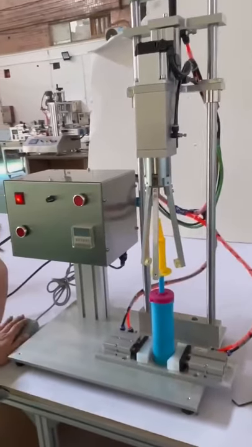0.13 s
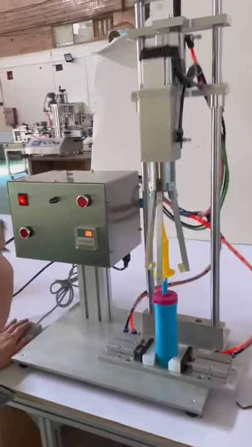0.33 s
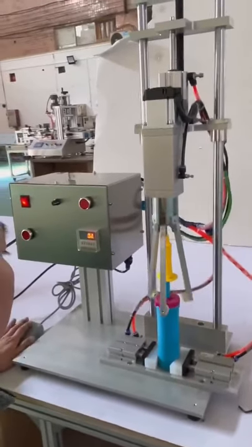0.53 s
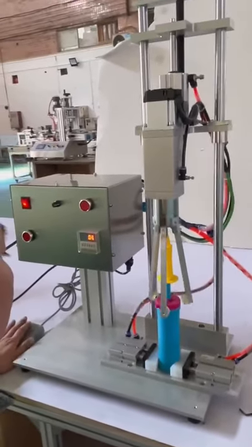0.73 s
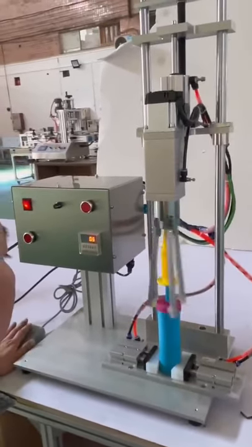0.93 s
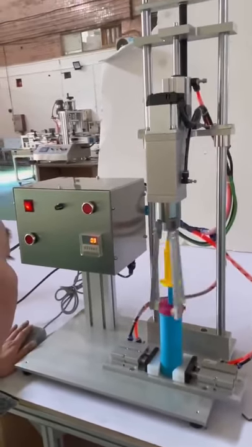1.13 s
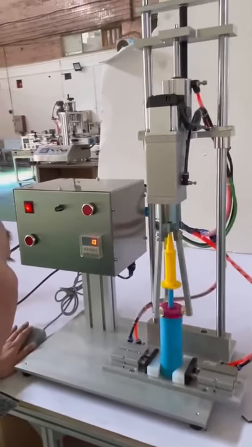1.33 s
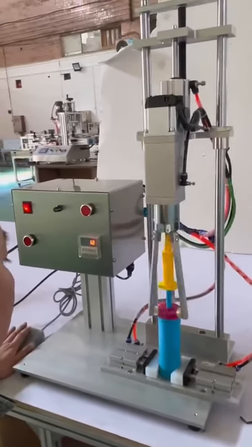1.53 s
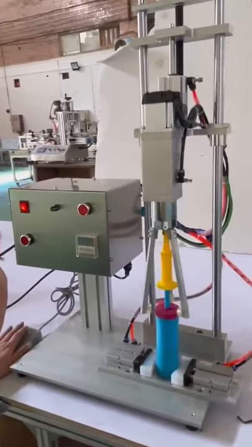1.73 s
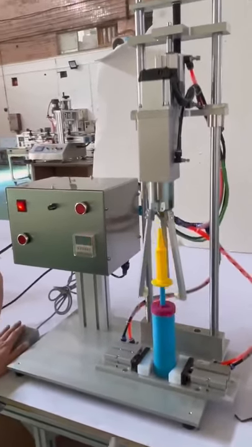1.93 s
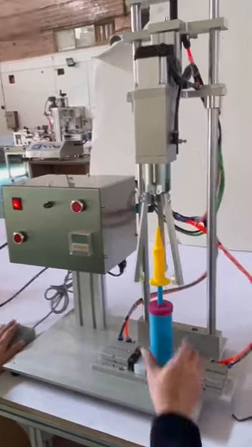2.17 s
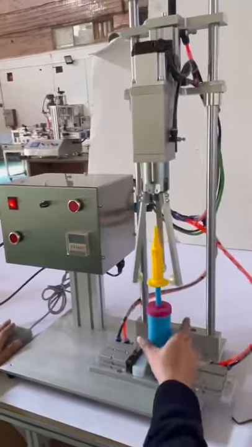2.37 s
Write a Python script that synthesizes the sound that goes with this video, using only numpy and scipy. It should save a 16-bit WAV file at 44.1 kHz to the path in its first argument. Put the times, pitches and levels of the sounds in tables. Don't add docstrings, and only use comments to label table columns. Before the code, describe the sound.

A pneumatic capping machine runs one cycle, close up in a large echoing workshop with faint low machine murmur. At 0.2 s a valve snaps and bright air hisses; at 0.5 s the head thumps with rattle and low rumble. Jaws clack shut with puffs at 0.8 s, then a faint low grind near 1 s. At 1.56 s a sharp snap and fading hiss, ending in a soft bump at 2.1 s.

```python
import sys
import numpy as np
from scipy import signal
from scipy.fft import rfft, irfft
from scipy.io import wavfile
from scipy.ndimage import uniform_filter1d

SR = 44100
rng = np.random.default_rng(int(sys.argv[2]) if len(sys.argv) > 2 else 0)


def bounce(signal):
    frames = np.transpose(np.atleast_2d(signal))
    limited = np.clip(frames, -1, 1)
    pcm = np.round(limited * 32767).astype(np.int16)
    wavfile.write(sys.argv[1], SR, pcm)


def amplitude_ratio(level_db):
    exponent = np.asarray(level_db, float) / 20
    return 10 ** exponent


N = 105840


def unit(x):
    return x / np.sqrt(np.mean(x ** 2) + 1e-20)


def curve(rows):
    time_s, level_db = np.transpose(rows)
    return amplitude_ratio(np.interp(np.arange(N) / SR, time_s, level_db))


def butter(x, order, cut_hz, kind="low"):
    return signal.sosfilt(signal.butter(order, cut_hz, kind, fs=SR, output="sos"), x)


def bells(x, rows):
    hz = np.arange(x.shape[-1] // 2 + 1) * SR / x.shape[-1]
    gain_db = sum(db / (1 + (2 * (hz - centre) / width) ** 4) for centre, width, db in rows)
    return irfft(rfft(x) * amplitude_ratio(gain_db), x.shape[-1])


def drift(rate):
    r = np.exp(-80 * np.pi * rate / SR)
    slow = signal.lfilter([1], [1, -2 * r, r * r], rng.standard_normal(N // 40 + 2002))
    slow = slow[2000:]
    return np.interp(np.arange(N) / 40, np.arange(len(slow)), unit(slow))


def noise(spectrum, patchy_db, rate):
    hz = np.arange(1, N // 2 + 2) * SR / N
    f, db = np.transpose(spectrum)
    colour_db = np.interp(np.log(hz), np.log(f), db, left=-120, right=-120)
    shaped = rfft(rng.standard_normal(N)) * amplitude_ratio(colour_db)
    shared = drift(rate / 4)
    octave = np.log2(hz / 30)
    out = np.zeros(N)
    for k in range(-1, 10):
        window = np.cos(np.pi / 2 * np.clip(octave - k, -1, 1)) ** 2
        flicker = amplitude_ratio(patchy_db * (0.71 * shared + drift(rate)))
        out += irfft(shaped * window, N) * flicker
    return unit(out)


def bursts(rows, spectrum, rise_s, patchy_db):
    t = np.arange(N) / SR
    power = np.zeros(N)
    for start_s, level_db, t60_s in rows:
        fall = amplitude_ratio(level_db - 60 * np.clip(t - start_s, 0, 1) / t60_s)
        power += fall ** 2 * np.clip((t - start_s) / rise_s, 0, 1)
    return np.sqrt(power) * noise(spectrum, patchy_db, rate=96)


def struck(hits, modes, soft_hz, count):
    chatter_s, chatter_loss_db = 0.0016, 9
    lag = rng.uniform(.5, 1.465, (len(hits), count)).cumsum(axis=1)
    start_s, level_db = np.transpose(hits)
    at = ((start_s[:, None] + chatter_s * (lag - lag[:, :1])) * SR).astype(int)
    touch_db = level_db[:, None] + 1.0 - chatter_loss_db * np.arange(count)
    spread_db = rng.normal(0, 1.5, (len(hits), len(modes), count))
    out = np.zeros(N)
    for m, (hz, mode_db, t60_s) in enumerate(modes):
        clicks = np.full(N, 1e-18)
        np.add.at(clicks, at, amplitude_ratio(touch_db + mode_db + spread_db[:, m]))
        r, w = amplitude_ratio(-60 / (t60_s * SR)), 2 * np.pi * hz / SR
        sign = (-1) ** m
        out += signal.lfilter([0, np.sin(w) * sign], [1, -2 * r * np.cos(w), r * r], clicks)
    return butter(out, 2, min(soft_hz, 19000))


# pitch_hz, level_db
SHOP_COLOUR = [(15, -35), (55, -4), (240, -17.5), (800, -28), (1800, -50), (6500, -55), (11300, -58),
               (12200, -74)]


def shop_murmur():
    return amplitude_ratio(-37) * noise(SHOP_COLOUR, patchy_db=2.0, rate=11.8)


# time_s, level_db
SEEP_LEVEL = [(.2, -85), (.3, -58), (.73, -63), (.745, -83), (.8, -59.5), (1.5, -65.5), (2.1, -59.5),
              (2.4, -56.5)]
# pitch_hz, level_db
SEEP_COLOUR = [(1500, -4), (3500, 0), (6500, 0), (8500, -8), (11000, 3), (11900, -15)]


def seal_seepage():
    return curve(SEEP_LEVEL) * noise(SEEP_COLOUR, patchy_db=-1.8, rate=15)


# start_s, level_db
VALVE_HITS = [(.203, -43), (.22, -28), (.2352, -2.5), (.2435, -8.5), (.77, -16), (1.544, -32),
              (1.5515, -27), (1.5595, -4), (1.564, -15), (1.622, -28), (2.088, -23), (2.235, -42)]
# pitch_hz, level_db, t60_s
VALVE_MODES = [(1435, -7, 0.0036), (1838, -7, 0.029), (2063, -2, 0.014), (2391, 1.5, 0.01),
               (3094, -8, 0.022), (3630, -21, 0.055), (5420, -18, 0.011)]


def valve_spool():
    return struck(VALVE_HITS, VALVE_MODES, soft_hz=6000, count=2)


# start_s, level_db (rms), t60_s
AIR_PUFFS = [(.203, -37, 0.03), (0.2198, -19.5, 0.028), (0.229, -14, 0.063), (0.2349, -8, 0.2),
             (0.496, -19, 0.048), (.503, -13, 0.028), (.515, -38, 0.034), (.761, -33, 0.043),
             (0.7694, -19.5, 0.076), (0.774, -7.5, 0.019), (.7945, -5.5, 0.032), (.802, -36, 0.014),
             (1.544, -37.5, .1), (1.561, -12.5, 0.19), (1.57, -37, 0.12), (2.086, -41, 0.11)]
# pitch_hz, level_db
PUFF_COLOUR = [(700, -7), (1500, -3.5), (3300, -1.5), (5900, 3), (8000, -3.5), (11200, 2.5), (13500, -15),
               (14600, -8)]


def air_puffs():
    return bursts(AIR_PUFFS, PUFF_COLOUR, rise_s=0.0019, patchy_db=4.0)


# start_s, level_db
PIN_TICKS = [
    (.203, -40),
    (.2202, -25),
    (.7945, -9),
    (.7965, -6.5),
    (.497, -17),
    (.514, -21),
]
# pitch_hz, level_db, t60_s
PIN_MODES = [(5800, 0, 0.0075), (6550, -3.5, 0.0075), (11800, -27, 0.017)]


def steel_pins():
    return struck(PIN_TICKS, PIN_MODES, soft_hz=18000, count=2)


# start_s, level_db (rms), t60_s
SEAL_SPITS = [(.2292, -15.5, 0.024), (.239, -22, 0.016), (.252, -28, .03), (.554, -51, 0.052),
              (.5756, -41, 0.08), (.6006, -52, .05), (.6235, -41.5, 0.038), (.7615, -28, 0.061),
              (.7695, -24, 0.056), (.7735, -42.5, 0.013), (1.552, -33, .04), (1.562, -4.5, 0.06),
              (1.578, -19.5, 0.23), (2.131, -50, .06)]
# pitch_hz, level_db
SPIT_COLOUR = [(6500, -15), (8000, -8), (10500, 3), (12000, -4), (13500, -14), (14500, -22)]


def seal_spits():
    return bursts(SEAL_SPITS, SPIT_COLOUR, rise_s=0.0016, patchy_db=1.5)


# start_s, level_db (rms), t60_s
CONTACT_CRACKS = [
    (.235, -28, 0.018),
    (.5035, -17, 0.028),
    (.7755, -23, .022),
    (.7945, -27, .025),
    (1.5595, -10, 0.025),
    (2.087, -35, 0.046),
]
# pitch_hz, level_db
CRACK_COLOUR = [(3000, -8), (9100, 0), (12000, -8), (14300, 0), (15800, 6)]


def contact_cracks():
    return bursts(CONTACT_CRACKS, CRACK_COLOUR, rise_s=0.00075, patchy_db=13)


# start_s, level_db (rms), t60_s
LOOSE_RATTLES = [(.2355, -19.5, 0.065), (.287, -40, 0.091), (.488, -16.5, 0.073), (.495, -13, 0.076),
                 (.503, -14.5, 0.15), (.517, -19.5, 0.14), (.7755, -18, 0.12), (.787, -16, 0.037),
                 (.795, -5, 0.042), (1.56, -9, 0.038), (1.572, -17, 0.083), (1.621, -29, 0.21),
                 (2.076, -36, 0.39), (2.086, -25, 0.062)]
# pitch_hz, level_db
RATTLE_COLOUR = [(100, 0), (200, 7), (500, 2), (1300, 1), (2500, -4.5), (4500, -26), (8000, -65)]


def loose_parts():
    return bursts(LOOSE_RATTLES, RATTLE_COLOUR, rise_s=0.0023, patchy_db=3.0)


# time_s, level_db
DOWN_FLOW = [(.236, -51.5), (.255, -38), (.3, -21.5), (.34, -29.5), (.47, -26), (.52, -26), (.56, -39),
             (.65, -47), (.76, -66)]
# pitch_hz, level_db
DOWN_COLOUR = [(400, -17), (1500, -11.5), (4000, -4), (5800, -2), (8500, -12), (10500, 3.5), (12500, -18),
               (14500, -13)]
# time_s, level_db
UP_FLOW = [(1.56, -81.5), (1.59, -23), (1.63, -34), (1.71, -36.5), (1.78, -30.5), (1.95, -32), (2.085, -33),
           (2.115, -51.5), (2.2, -63)]
# pitch_hz, level_db
UP_COLOUR = [(400, -10.5), (1500, -12), (4000, -10), (5800, -3.5), (8500, -9.5), (10500, -7.5),
             (12500, -22), (14200, -36)]
# pitch_hz, width_hz, level_db
PIPE_RESONANCES = [(1885, 440, 6.5), (2636, 290, -4), (3460, 210, -4), (3920, 67, 3), (4280, 210, -5),
                   (5430, 160, 1.5), (7100, 260, 2.5), (10270, 2200, -8.5)]


def exhaust_jets():
    down = curve(DOWN_FLOW) * noise(DOWN_COLOUR, patchy_db=.8, rate=30)
    up = curve(UP_FLOW) * noise(UP_COLOUR, patchy_db=.8, rate=30)
    return bells(down + up, PIPE_RESONANCES)


# start_s, level_db
HOUSING_THUDS = [
    (.238, -13.5),
    (.245, -38),
    (.777, -14.5),
    (.797, -18.5),
    (1.561, -14.5),
    (1.572, -15.5),
]
# pitch_hz, level_db, t60_s
HOUSING_MODES = [(83, -1, 0.04), (150, 0.5, 0.052), (223, 7.5, 0.015), (327, 1, 0.029), (492, -7, 0.046)]


def housing_thuds():
    return struck(HOUSING_THUDS, HOUSING_MODES, soft_hz=530, count=1)


# start_s, level_db
PISTON_KNOCKS = [
    (.287, -21),
    (.291, -32),
    (.4945, -25.5),
    (1.6225, -20.5),
    (1.626, -18),
    (1.63, -17.5),
    (2.087, -35.5),
    (2.098, -25.5),
]
# pitch_hz, level_db, t60_s
CYLINDER_MODES = [(637, -22, 0.054), (920, -1.5, 0.029), (1110, 0, 0.0065), (1657, -4.5, 0.037),
                  (2490, -13, .04), (3640, -10.5, .02)]


def piston():
    return struck(PISTON_KNOCKS, CYLINDER_MODES, soft_hz=8200, count=2)


# start_s, level_db
FRAME_BLOWS = [
    (.49, -23),
    (.5015, -18.5),
    (.51, -25),
    (.525, -29.5),
    (2.075, -28.5),
    (2.09, -24.5),
    (2.11, -21),
    (2.128, -41),
]
# pitch_hz, level_db, t60_s
FRAME_MODES = [(80, 1, 0.39), (81.6, -2.5, 0.32), (128, 2.5, 0.052), (171.5, -5.5, 0.064),
               (231, -12.5, 0.21), (297, -11.5, 0.13), (415, -21.5, 0.13)]


def steel_frame():
    return struck(FRAME_BLOWS, FRAME_MODES, soft_hz=330, count=1)


# start_s, level_db
LANDING_BLOWS = [
    (.5025, 0.5),
    (.525, -12.5),
]
# pitch_hz, level_db, t60_s
STOP_MODES = [(135, 0.0078, 0.053)]


def landing():
    return struck(LANDING_BLOWS, STOP_MODES, soft_hz=600, count=1)


# start_s, level_db (rms), t60_s
TABLE_SHUDDERS = [
    (.52, -19.5, 0.82),
    (.8, -31.5, 0.37),
    (2.1, -23.5, 0.27),
]
# pitch_hz, level_db
SHUDDER_COLOUR = [(50, -26), (90, 5.5), (150, 2.5), (310, -3), (600, -18.5), (1200, -20)]


def table_shudder():
    return bursts(TABLE_SHUDDERS, SHUDDER_COLOUR, rise_s=0.024, patchy_db=-2.0)


# start_s, level_db
JAW_CONTACTS = [
    (.7755, -2),
    (.779, -11),
    (.798, -5.5),
    (.802, -27),
    (1.5635, -11),
    (1.57, -21),
    (1.576, -22),
]
# pitch_hz, level_db, t60_s
JAW_MODES = [(343, 3, 0.018), (423, 8.5, 0.0064), (775, -5, 0.033), (1060, 2.5, 0.0037),
             (1540, -7.5, 0.0075)]


def jaws():
    return struck(JAW_CONTACTS, JAW_MODES, soft_hz=2700, count=2)


# start_s, level_db
FINGER_CONTACTS = [
    (.7875, -13.5),
    (.7893, -14),
    (.7912, -16),
]
# pitch_hz, level_db, t60_s
FINGER_MODES = [(1700, -4, 0.028), (5630, -21, 0.011)]


def jaw_finger():
    return struck(FINGER_CONTACTS, FINGER_MODES, soft_hz=12000, count=1)


# time_s, level_db
TWIST_LEVEL = [
    (.84, -63),
    (.89, -52),
    (.95, -35.5),
    (1.08, -41.5),
    (1.25, -76),
    (1.45, -84),
]
# pitch_hz, level_db
GRIND_COLOUR = [(60, -5), (130, 8.5), (330, -1.5), (800, -4), (2000, -28), (6000, -17), (11000, -40),
                (12300, -70)]


def cap_twist():
    return curve(TWIST_LEVEL) * noise(GRIND_COLOUR, patchy_db=-3.5, rate=8.9)


def hall(x):
    t60_s, treble_t60_s, treble_hz = 2.74, 0.68, 4850
    level_db, onset_s, cut_hz = -23.5, 0.026, 11800
    t = np.arange(N) / SR
    white = rng.standard_normal(N)
    low = butter(white, 1, treble_hz)
    tail = low * amplitude_ratio(-60 * t / t60_s) + (white - low) * amplitude_ratio(-60 * t / treble_t60_s)
    tail = tail * (1 - np.exp(-t / onset_s))
    tail = butter(tail, 2, [150, cut_hz], "band")
    return amplitude_ratio(level_db) * signal.fftconvolve(x, tail / np.sqrt(np.sum(tail ** 2)))[:N]


def scene():
    blows = valve_spool() + steel_pins() + housing_thuds() + piston()
    blows += steel_frame() + landing() + jaws() + jaw_finger()
    blows = butter(blows, 2, 50, "high")
    rough = air_puffs() + seal_spits() + contact_cracks() + loose_parts()
    rough += exhaust_jets() + table_shudder() + cap_twist()
    echo = hall(rough + 0.48 * blows)
    return (blows + rough + echo + seal_seepage() + shop_murmur())[None]


# pitch_hz, level_db
FAINTEST = [(2400, -99), (11850, -99), (12050, -87), (14100, -86), (14500, -78)]


def drop_weak_bands(x):
    hz, _, z = signal.stft(x, SR, nperseg=1024)
    power = np.abs(z) ** 2

    def level(bins, frames):
        smooth = uniform_filter1d(uniform_filter1d(power, size=bins, axis=1), size=frames, axis=2)
        return 10 * np.log10(np.abs(smooth) + 1e-18)

    pitch = hz[:, None]
    over_floor = level(9, 2) - np.interp(hz, *np.transpose(FAINTEST))[:, None]
    over_neighbours = level(3, 5) - level(41, 5) + 5.6 + 20 * (pitch > 13000)
    margin_db = np.minimum(over_floor, over_neighbours)
    keep = np.where(pitch > 2400, np.clip(.5 + margin_db / 2, 1e-3, 1), 1)
    return signal.istft(z * keep, SR, nperseg=1024)[1][:, :N]


def low_pass(x):
    return signal.sosfilt(signal.butter(12, 15840, fs=SR, output="sos"), x)


# pitch_hz, width_hz, level_db
MIC_NOTCHES = [(4900, 520, -11.5), (9130, 950, -29), (14250, 1300, -14)]


def record(dry):
    ceiling = .66
    x = drop_weak_bands(bells(dry, MIC_NOTCHES))
    x = x / (1 + np.abs(x / ceiling) ** 6) ** (1 / 6)
    x = signal.sosfilt(signal.cheby2(12, 80, 15900, fs=SR, output="sos"), x)
    return low_pass(x)


dry = scene()
out = record(dry)
bounce(out)
```